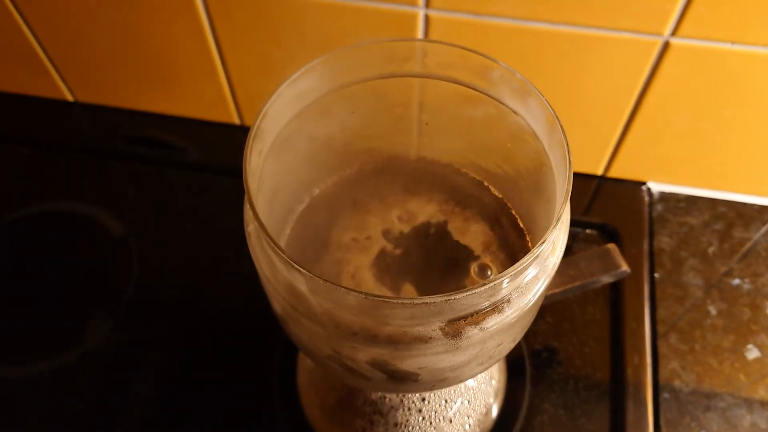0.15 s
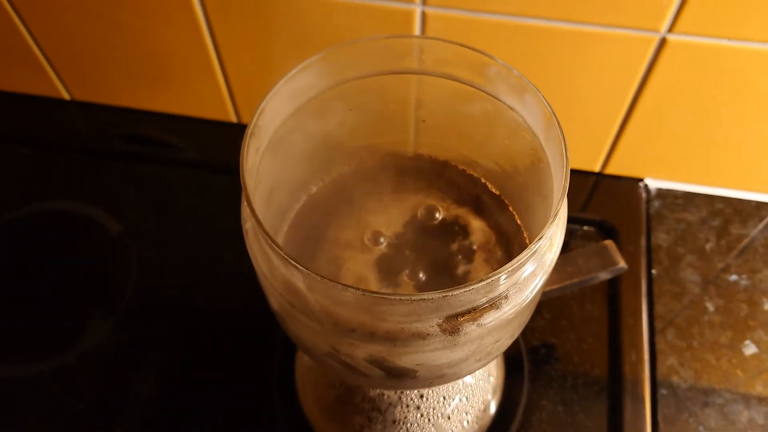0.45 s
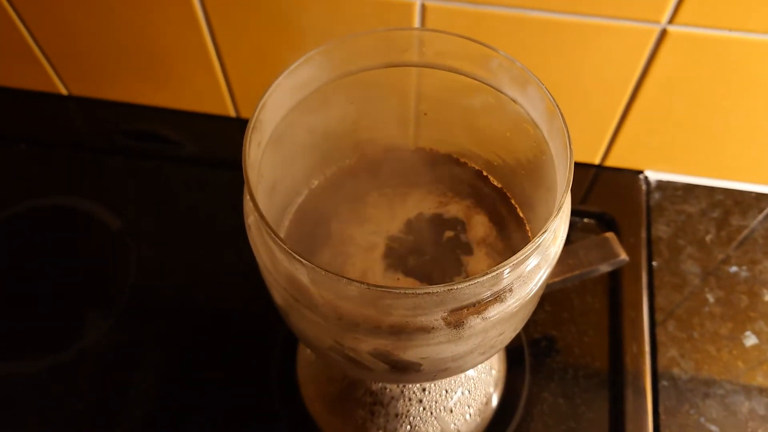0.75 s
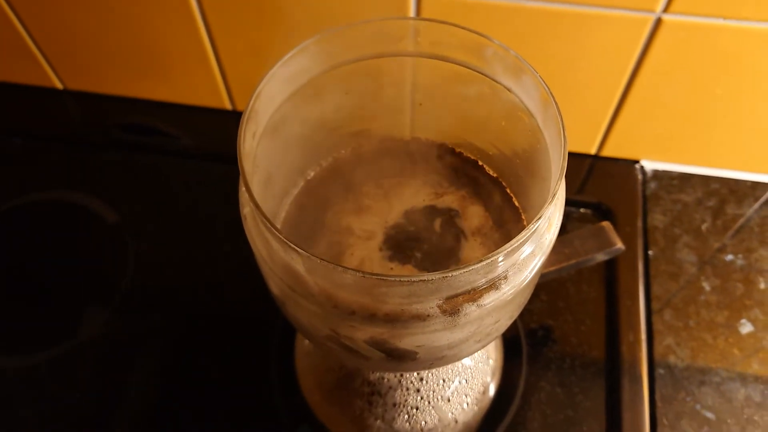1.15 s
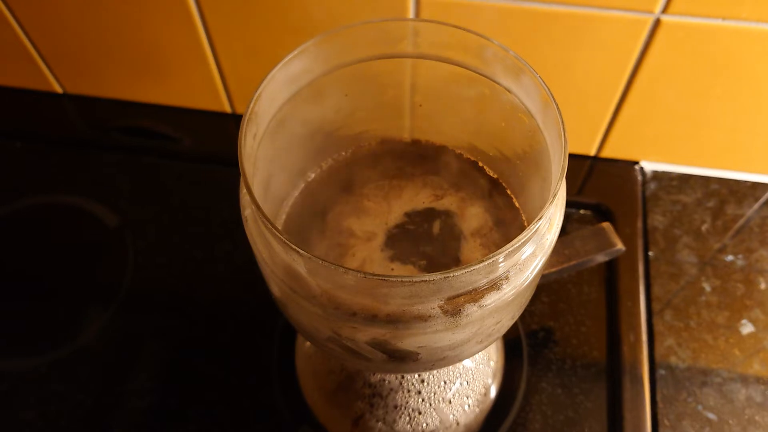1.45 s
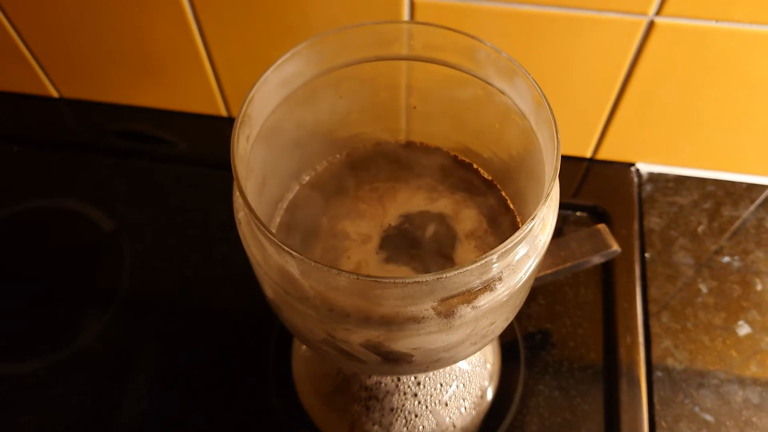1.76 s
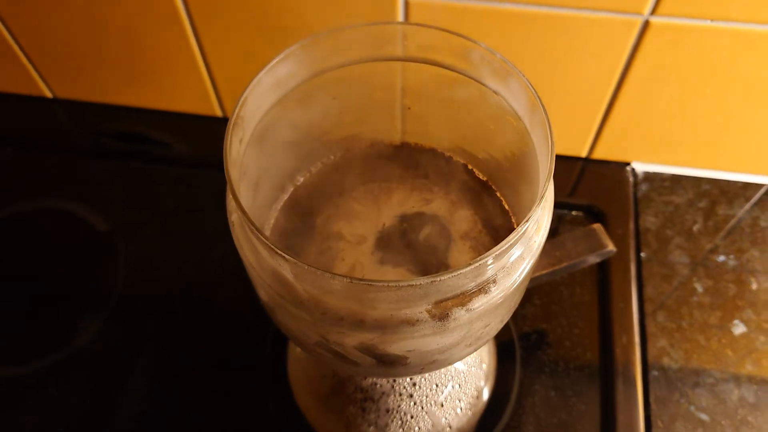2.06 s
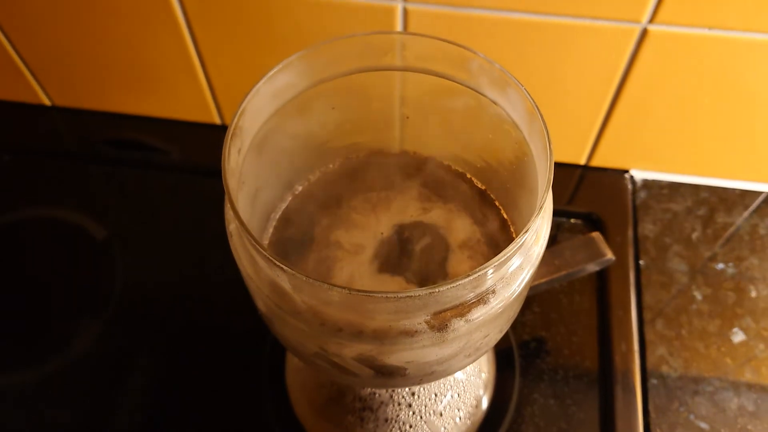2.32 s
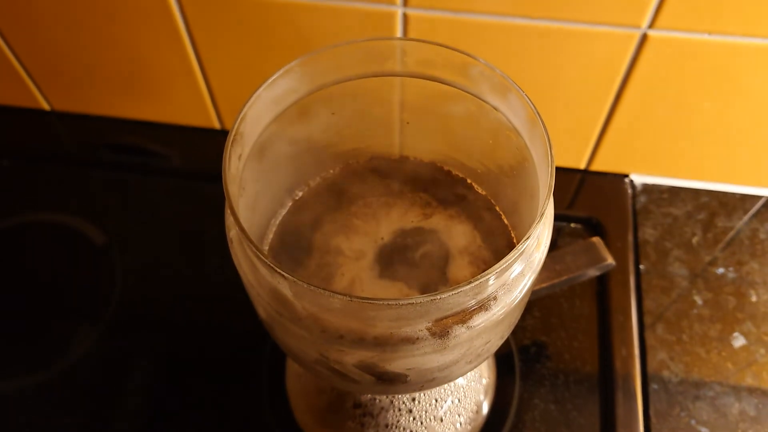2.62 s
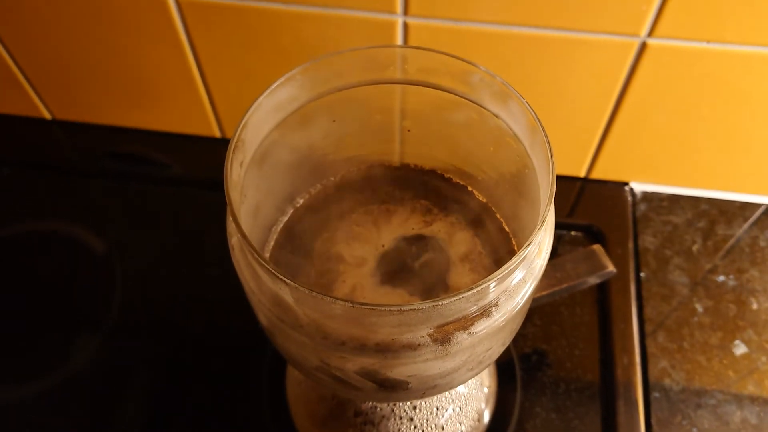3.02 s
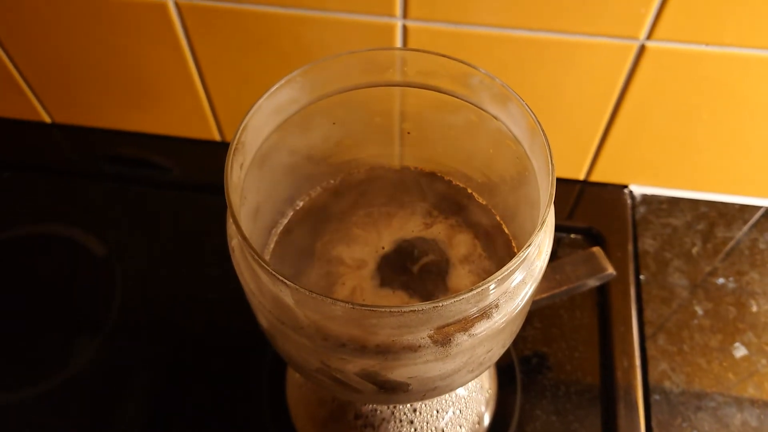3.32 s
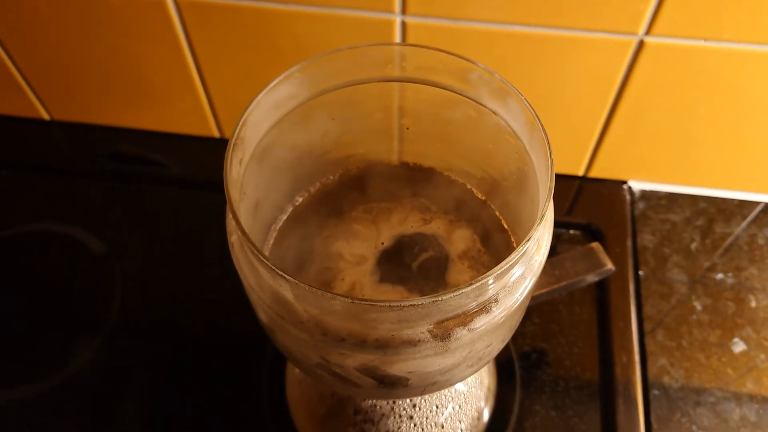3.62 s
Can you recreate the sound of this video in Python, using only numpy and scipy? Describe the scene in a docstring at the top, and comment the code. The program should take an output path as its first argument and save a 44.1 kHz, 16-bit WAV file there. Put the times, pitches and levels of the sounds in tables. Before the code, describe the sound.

A glass coffee maker gulps and fizzes briefly, then dry microphone-handling ticks over low hum

```python
"""A glass coffee maker on a humming stove: foam fizzes, steam sings, the pot knocks and gulps, bubbles burst.
Filtered noise makes foam, steam and simmering; fading sine waves make the pot and bubbles ring.
Then something rubs and sputters at the microphone, probably its housing under the hand: hisses and a snap
made of noise and clicks, then runs of dry ticks at the right port (microphone opening), then the left.
When they stop, the hum, room air and soft simmering remain, and a low sine drone sets in and swells."""
import sys
import numpy as np
from scipy import signal
from scipy.fft import rfft, irfft
from scipy.io import wavfile
from scipy.ndimage import uniform_filter1d

SR = 44100
rng = np.random.default_rng(int(sys.argv[2]) if len(sys.argv) > 2 else 0)


def wav_record(signal):
    """Record a signal, one row per channel, as 16-bit PCM in the file named by sys.argv[1]."""
    frames = np.transpose(np.atleast_2d(signal))
    bounded = np.clip(frames, -1, 1)
    # unit amplitude maps onto the largest positive 16-bit level
    quanta = np.round(bounded * 32767).astype(np.int16)
    wavfile.write(sys.argv[1], SR, quanta)


N = 166698


def amp(db):
    """Turn decibels into a plain gain."""
    return 10 ** (np.asarray(db) / 20)


def clock():
    """Time of every sample in seconds."""
    return np.arange(N) / SR


def pan(db):
    """Left and right gains for a left-minus-right level difference."""
    return amp(np.array([[db], [-db]]) / 2)


def freqs(size):
    """Frequencies of a spectrum in Hz, kept above zero."""
    return np.maximum(np.arange(size // 2 + 1) * SR / size, 1)


def colour(table, f):
    """Each dB column of a table, joined on a log-frequency axis."""
    hz, *columns = np.array(table, float).T
    return np.array([np.interp(np.log(f), np.log(hz), column) for column in columns])


def shape(x, db):
    """Filter by a gain in dB for each frequency."""
    return irfft(rfft(x) * amp(db), N)


def noise():
    """Two unrelated white noises at 0 dB per Hz."""
    return rng.standard_normal((2, N)) * np.sqrt(SR / 2)


def band_noise(hz, octaves):
    """Two unrelated noises of rms 1 in a bell-shaped band."""
    x = shape(noise(), -6 * (np.log2(freqs(N) / hz) / octaves) ** 2)
    return x / x.std()


def walk(rate):
    """Smooth random wandering with spread 1, heading for a new value `rate` times a second."""
    step = max(int(SR / rate), 1)
    stairs = np.repeat(rng.standard_normal(N // step + 1), step)
    smooth = uniform_filter1d(stairs, step)[:N]
    return smooth / smooth.std()


def tone(hz):
    """Steady sine of rms 1 that starts at a random point of its cycle."""
    return np.sqrt(2) * np.sin(2 * np.pi * (hz * clock() + rng.random()))


def bell(t, centre, width):
    """Smooth swell to 1 and back; the width is the standard deviation."""
    return np.exp(-((t - centre) / width) ** 2 / 2)


def spell(t, start, length):
    """Fade in, hold, fade out."""
    fade_s = 0.08
    return np.clip(np.minimum(t - start, start + length - t) / fade_s, 0, 1)


def add(out, start, x):
    """Mix a sound in at a time in seconds."""
    i = max(int(start * SR), 0)
    out[:, i:i + x.shape[-1]] += x[..., :N - i]


def with_tail(x, db, t60):
    """A sound with a short diffuse tail, made of noise that falls by 60 dB in t60 seconds."""
    t = clock()[:SR // 2]
    tail = rng.standard_normal((2, len(t))) * amp(-60 * t / t60)
    tail *= amp(db) / np.sqrt(np.sum(tail ** 2) / 2)
    return x + signal.fftconvolve(x, tail, axes=1)[:, :N]


# brief dip of the hum: time_s, change_db
HUM_DIP = [(1.77, 0), (1.805, -10), (1.83, -1.5), (1.92, 0)]


def mains_hum():
    """A low sine hum whose strength wavers slightly and dips briefly."""
    mains_hz, level_db, waver, left_minus_right_db = 49.23, -43, 0.017, -2  # waver is a fraction of the strength
    dip_db = np.interp(clock(), *np.array(HUM_DIP).T)
    hum = tone(mains_hz) * amp(level_db + dip_db) * (1 + waver * walk(11))
    return hum * pan(left_minus_right_db)


# pitch of each faint whine: pitch_hz
WHINE_HZ = [400, 434, 502, 542, 4524, 4890, 5739]
# average level of each whine, in the same order: left_db, right_db
WHINE_LEVELS = [(-87.5, -81.5), (-86, -87), (-80.5, -101), (-91, -82.5), (-84, -92.5), (-87.5, -94.5),
                (-100, -88.5), (-79, -106)]


def whines():
    """Faint sines of fixed pitch whose levels drift a little."""
    drift_db = 1
    out = np.zeros((2, N))
    for hz, (left, right) in zip(WHINE_HZ, WHINE_LEVELS):
        out += tone(hz) * amp(drift_db * walk(6.8)) * amp([[left], [right]])
    return out


# colour of the kitchen air: pitch_hz, left_db_per_hz, right_db_per_hz
ROOM = [(20, -88.5, -81.5), (47.3, -72, -73), (76.5, -77, -86.5), (140, -94.5, -92), (192, -100, -100),
        (272, -116, -115), (379, -101, -99.5), (684, -105, -103.5), (735, -104, -104), (1140, -102, -97),
        (1404, -108, -104.5), (2100, -112.5, -104), (2650, -114, -110.5), (3100, -112.5, -114.5),
        (4210, -111, -115), (4550, -104, -112), (5700, -119, -111), (6670, -123, -120),
        (8050, -114.5, -121), (10560, -125, -123), (10800, -126, -124.5), (12700, -120.5, -121.5),
        (17300, -126, -125)]


def room_air():
    """Broad background noise, more alike on both sides in the bass than in the treble."""
    most_alike, alike_hz, waver_db = 0.73, 1400, .5  # most_alike: 1 would be identical sides
    f = freqs(N)
    alike = most_alike / (1 + (f / alike_hz) ** 2)
    # mix a shared noise with a noise of opposite sign on each side
    mid, side = rfft(noise()) * np.sqrt(np.array([1 + alike, 1 - alike]) / 2)
    air = irfft(np.array([mid + side, mid - side]) * amp(colour(ROOM, f)), N)
    return air * amp(waver_db * walk(5.92))


# spells of fizzing: start_s, length_s, level_db (before colouring), left_minus_right_db, brightest_hz
FIZZ = [(-.07, 0.32, -69.5, -3.5, 10200), (0.503, 0.29, -75, 0, 10400), (1.52, 0.2, -77, -11, 13700),
        (1.722, .1, -66.5, -2, 13800)]
# colour of the foam: pitch_hz, gain_db
FOAM = [(1500, -7.5), (4500, 4.5), (7000, -2.5), (8500, -0.5), (10000, 2.5), (11500, 1.5), (14000, 4),
        (16000, -8)]
# louder crackles: start_s, level_db (before colouring), left_minus_right_db
CRACKLES = [(.059, -60, -4), (0.0707, -53, -3), (.1296, -70, 0), (0.153, -65, 5), (0.1791, -59, -10),
            (0.539, -55, 4), (0.564, -63.5, -7), (0.599, -59.5, -5), (0.6286, -62.5, 7), (0.649, -60, -0.5),
            (0.6693, -61, -8)]


def foam():
    """Spells of tiny bursting bubbles, each with its own bubble size, and louder crackles among them."""
    grains_per_s, spread_db = 3000, 3.2
    lift_db, lift_width_hz, crackle_decay_s = 4.5, 1100, 0.0033
    t, f = clock(), freqs(N)
    struck = rng.random((2, N)) < grains_per_s / SR
    strength = rng.standard_normal((2, N)) * amp(spread_db * rng.exponential(size=(2, N)))
    grains = struck * strength
    grains /= grains.std()
    fizz, crackle_level = np.zeros((2, N)), np.zeros((2, N))
    for start, length, db, side_db, hz in FIZZ:
        lift = lift_db * np.exp(-((f - hz) / lift_width_hz) ** 2)
        fizz += pan(side_db) * amp(db) * spell(t, start, length) * shape(grains, lift)
    for start, db, side_db in CRACKLES:
        fade = (t > start) * np.exp(-abs(t - start) / crackle_decay_s)
        crackle_level += pan(side_db) * amp(db) * fade
    crackles = rng.standard_normal((2, N)) * crackle_level
    return shape(fizz + crackles, colour(FOAM, f))


# spells of singing steam: start_s, length_s, left_db, right_db (before the flicker)
SINGING = [(-.05, 0.35, -78.5, -79), (2.074, 0.45, -81.5, -82)]


def steam():
    """Thin singing: a narrow high band of noise that flickers and fades in and out."""
    centre_hz, width_hz, flicker_db = 9820, 800, 1.3
    t = clock()
    offset = (freqs(N) - centre_hz) / (width_hz / 2)
    hiss = shape(noise(), -20 * np.log10(1 + offset ** 2))
    hiss = hiss / hiss.std() * amp(flicker_db * walk(39))
    level = sum(amp([[left], [right]]) * spell(t, start, length) for start, length, left, right in SINGING)
    return hiss * level


# soft swells: centre_s, width_s, gain_db
SIMMERS = [(.6, 0.49, 1), (1.28, 0.14, -8), (2.55, 0.088, 0), (2.96, 0.11, -1), (3.25, 0.084, 1.5)]
# resonances of the simmering: pitch_hz, width_hz, level_db_per_hz (before the swells)
SIMMER = [(398, 69, -101), (670, 100, -106), (1144, 620, -102), (1880, 290, -106)]


def simmer():
    """Soft swells of boiling noise in the resonances of the pot."""
    t, f = clock(), freqs(N)
    swell = sum(amp(db) * bell(t, centre, width) for centre, width, db in SIMMERS)
    body = sum(amp(db) / (1 + (2 * (f - hz) / width) ** 2) for hz, width, db in SIMMER)
    return swell * shape(noise(), 20 * np.log10(body))


POT_TAIL_DB, POT_TAIL_S = -21, .9  # faint tail in the room, shared by knocks and bubbles
# ringing of the pot: pitch_hz, t60_s (time to fall 60 dB), relative_db
POT = [(198.3, 0.22, -11), (667, 0.1, 0), (887, 0.083, -5.5), (1840, 0.045, -16.5)]
# knocks and gulps: start_s, level_db (scales ring and splash), tilt_db_per_octave, push_ms (fade-in)
KNOCKS = [(.033, -49, -9, 4.2), (0.252, -47, -1.5, 1.8), (0.3235, -41, -1.5, 3.1), (0.3357, -45, -2, 16)]


def pot_knocks():
    """Each push sets the pot ringing, with a slightly unsteady pitch, and adds a splash of noise."""
    slosh_amount = .012  # pitch wobble as a fraction
    splash_db, splash_t60_s = -12.5, 0.15
    out, t = np.zeros((2, N)), clock()[:SR // 2]
    slosh = slosh_amount * walk(91.5)
    splash = band_noise(hz=674, octaves=0.49)
    for start, db, tilt, push_ms in KNOCKS:
        now = int(start * SR) + np.arange(len(t))
        cycles_per_hz = np.cumsum(1 + slosh[now]) / SR
        ring = 0
        for hz, t60, level in POT:
            tilt_db = tilt * np.log2(hz / POT[1][0])
            ring = ring + amp(level + tilt_db - 60 * t / t60) * np.sin(2 * np.pi * hz * cycles_per_hz)
        wet = splash[:, now] * amp(splash_db - 60 * t / splash_t60_s)
        push = np.minimum(t * 1000 / push_ms, 1)
        add(out, start, amp(db) * (ring + wet) * push)
    return with_tail(out, POT_TAIL_DB, POT_TAIL_S)


# bursting bubbles, and low pops that go with the rubbing and the snap: start_s, pitch_hz,
# level_db (before swell and decay), t60_s, glide_octaves_per_s, left_minus_right_db
BUBBLES = [(0.0347, 184, -28, 0.054, -13, -3.5), (0.058, 4480, -51, 0.018, 1, -7),
           (.2765, 650, -25, 0.074, 1, 2), (.338, 651, -32, 0.049, -2, -5), (0.41, 2940, -49, 0.015, -5, 0),
           (.447, 1240, -59, 0.036, -2, 10), (.781, 505, -48, 0.064, -3.5, 15),
           (0.7932, 370, -39.5, 0.011, 8, 25.5), (.793, 706, -45, 0.042, -10, -6),
           (.889, 2154, -52, 0.069, -6.5, 0), (0.897, 1904, -44.5, 0.034, -10, -4),
           (.937, 508, -52, 0.078, -16.5, -21), (.948, 397, -38, 0.027, 7, 9),
           (1.0075, 418, -28.5, 0.0093, 3, -7)]


def bubbles():
    """Fading sines at each bubble's own gliding pitch; longer rings also swell more slowly."""
    rise_per_ring = 0.0045 / 0.047  # rise time as a share of t60
    out, t = np.zeros((2, N)), clock()[:SR // 2]
    for start, hz, db, t60, glide, side_db in BUBBLES:
        pitch_hz = hz * 2 ** (glide * np.minimum(t, t60))
        phase = np.cumsum(pitch_hz) / SR
        swell = 1 - np.exp(-t / (rise_per_ring * t60))
        add(out, start, pan(side_db) * swell * amp(db - 60 * t / t60) * np.sin(2 * np.pi * phase))
    return with_tail(out, POT_TAIL_DB, POT_TAIL_S)


# dull bumps of handling: centre_s, width_s, level_db, left_minus_right_db
BUMPS = [(.14, 0.037, -49, -1), (.31, 0.025, -55, 2), (.75, 0.057, -56, 7.5), (.99, 0.068, -52.5, -4),
         (1.58, 0.089, -59.5, -10), (1.779, 0.015, -45, 3), (2.19, 0.037, -48.5, 0.5),
         (2.47, 0.003, -55, 13)]


def handling_bumps():
    """Short swells of low noise that reach the two ports separately."""
    t = clock()
    level = sum(pan(side_db) * amp(db) * bell(t, centre, width) for centre, width, db, side_db in BUMPS)
    return band_noise(hz=78, octaves=0.55) * level


# narrow resonances of the right port: pitch_hz, width_hz, lift_db
PORT = [(5740, 500, 20), (7380, 500, 17.5), (9000, 480, 8)]


def port_lift(f):
    """Resonances of the right port in dB; the left has none."""
    lift = sum(db * np.exp(-((f - hz) / width) ** 2) for hz, width, db in PORT)
    return np.array([[0], [1]]) * lift


def impulse(db):
    """Click with a given spectrum in dB that begins at once and rings only afterwards (minimum phase)."""
    cepstrum = irfft(db * np.log(10) / 20)
    half = cepstrum.shape[-1] // 2
    # fold the backward half of the response onto the forward half
    cepstrum[:, 1:half] *= 2
    cepstrum[:, half + 1:] = 0
    return irfft(np.exp(rfft(cepstrum)))


def port_ticks(table, body, near, f):
    """Stick-slip ticks, each with its own brightness and ring, reaching the far port late."""
    far_lag_s, ring_db, ring_octaves = 0.000617, 6, .3
    out = np.zeros((2, N))
    octaves = np.log2(np.maximum(f, 400) / 400)  # the tilt starts at 400 Hz
    for start, db, tilt, hz in table:
        ring = ring_db * np.exp(-(np.log2(f / hz) / ring_octaves) ** 2)
        click = impulse(body + tilt * octaves + ring)
        click *= -amp(db) / abs(click).max()
        add(out, start, near * click)
        add(out, start + far_lag_s, (1 - near) * click)
    return with_tail(out, db=-12, t60=.035)


# colour of a tick at the right port: pitch_hz, left_db, right_db
RIGHT_BODY = [(30, -10, -18), (110, -11, 6.5), (255, -11.5, -4.5), (420, 1, 7.5), (856, -8, 1.5),
              (1040, -12.5, -1.5), (1500, -23, -5.5), (2160, -20, -3.5), (2160, -14, -6.5),
              (2760, -26, -10), (4400, -36, -16.5), (6800, -36, -25.5), (9400, -50, -22.5),
              (16500, -43, -49)]
# ticks at the right port: start_s, peak_db (louder side, before the tail), tilt_db_per_octave, ring_hz
RIGHT_TICKS = [(.7825, -41, -1.5, 905), (.7888, -34.5, -2, 1100), (.7933, -38, -3.5, 500),
               (1.008, -20.5, 4.5, 5750), (1.00905, -42, 11, 5880), (1.4661, -40, -1, 1210),
               (1.5104, -39.5, -2, 5700), (1.5519, -37.5, -3, 980), (1.574, -38.5, -3, 620),
               (1.606, -40.5, -1.5, 1220), (1.6375, -41, -3, 905), (1.7615, -28.5, 0, 1000),
               (1.7731, -30, 4, 1100), (1.7824, -34.5, -7, 1020), (1.7865, -30.5, 1, 1410),
               (1.9148, -38.5, 1, 5700)]


def right_ticks():
    """Dry ticks and the snap: clicks coloured by the right port and its resonances."""
    f = freqs(size=2048)
    near = np.array([[0], [1]])
    return port_ticks(RIGHT_TICKS, colour(RIGHT_BODY, f) + port_lift(f), near, f)


# rubbing hisses: start_s, rise_s, hold_s, release_s, gain_db, tilt_db_per_octave
RUBS = [(0.785, 0.017, 0.092, 0.096, -9, 2.5), (0.788, 0.097, 0.035, 0.059, -3, -2),
        (1.004, 0.0061, 0.0024, 0.025, 2.5, -0.5)]
# colour of the rubbing: pitch_hz, left_db_per_hz, right_db_per_hz (before gain, tilt and port)
RUB = [(244, -104, -104), (483, -87.5, -87.5), (1000, -99, -90), (1490, -104, -96.5), (2620, -113, -95.5),
       (3150, -101, -99), (4700, -102, -100), (6550, -116, -100), (9400, -118, -100), (11700, -106, -101),
       (15900, -104, -100)]


def rubbing():
    """Uneven friction hiss that swells and dies smoothly and rings the right port."""
    rough_db, tilt_from_hz = 1.8, 5700
    t, f = clock(), freqs(N)
    friction = noise() * amp(rough_db * walk(280))
    octaves = np.log2(np.maximum(f / tilt_from_hz, 1))
    out = np.zeros((2, N))
    for start, rise, hold, release, db, tilt in RUBS:
        corners_s = start + np.cumsum([0, rise, hold, release])
        contact = np.interp(t, corners_s, [0, 1, 1, 0])
        force = amp(db) * np.sin(np.pi / 2 * contact) ** 2
        out += shape(friction * force, colour(RUB, f) + port_lift(f) + tilt * octaves)
    return out


# colour of a tick at the left port: pitch_hz, left_db, right_db
LEFT_BODY = [(30, -29, -11), (108, 12.5, -12), (262, -1.5, -14.5), (450, 2.5, -7.5), (750, 1.5, -9.5),
             (1120, -0.5, -7.5), (1560, -9, -28), (2220, -18.5, -3.5), (3220, -10.5, -28),
             (4650, -12.5, -38), (6500, -30, -49), (10100, -23.5, -28), (16000, -19.5, -38)]
# ticks at the left port: start_s, peak_db (louder side, before the tail), tilt_db_per_octave, ring_hz
LEFT_TICKS = [(1.9148, -34, 10, 5750), (2.1575, -37.5, 2, 14000), (2.1677, -41, -6, 1200),
              (2.1805, -36, 1, 1050), (2.1873, -40.5, -2, 1250), (2.1965, -34.5, 0.5, 1000),
              (2.2035, -38, 0.5, 1150), (2.2099, -36.5, 0, 1200), (2.2223, -35.5, 0, 1300),
              (2.237, -40.5, 0, 1090), (2.2429, -44, -4, 1250), (2.2484, -40, -3, 1300),
              (2.2582, -40, -0.5, 1300), (2.2649, -42, 0, 900), (2.2729, -43.5, -0.5, 1100),
              (2.2809, -40, -4, 846), (2.2906, -41, 0, 850), (2.3072, -41, -1.5, 600),
              (2.4714, -39.5, -3, 630)]


def left_ticks():
    """Dry ticks: clicks coloured by the left port, late at the right one."""
    f = freqs(size=2048)
    near = np.array([[1], [0]])
    return port_ticks(LEFT_TICKS, colour(LEFT_BODY, f), near, f)


# level of a soft scrape under the left ticks: time_s, left_db, right_db
SCRAPE = [(2.08, -84, -80), (2.2, -70, -67), (2.3, -74, -71), (2.6, -82, -79)]


def scrape():
    """A band of noise that swells and fades, silent outside the times in its table."""
    times, *sides = np.array(SCRAPE).T
    level_db = [np.interp(clock(), times, db, left=-np.inf, right=-np.inf) for db in sides]
    return band_noise(hz=2360, octaves=1.1) * amp(level_db)


def late_drone():
    """A low sine that sets in quickly, then keeps swelling with a wavering level."""
    start_s, rise_s = 3.275, 0.013
    start_db, swell_db_per_s = -61.5, 13.5
    age = np.maximum(clock() - start_s, 0)
    fade_in = np.minimum(age / rise_s, 1)
    return tone(108) * fade_in * amp(start_db + swell_db_per_s * age + walk(7))


def scene():
    """All the sounds together, in the order they first appear."""
    background = mains_hum() + whines() + room_air()
    coffee = foam() + steam() + simmer() + pot_knocks() + bubbles()
    microphone = handling_bumps() + right_ticks() + rubbing() + left_ticks() + scrape()
    return background + coffee + microphone + late_drone()


def record(dry):
    """The recorder cuts the top with a steep low-pass filter."""
    top_hz = 16050
    low_pass = signal.ellip(10, .2, 80, top_hz, fs=SR, output="sos")
    return signal.sosfilt(low_pass, dry)


dry = scene()
out = record(dry)
wav_record(out)
```